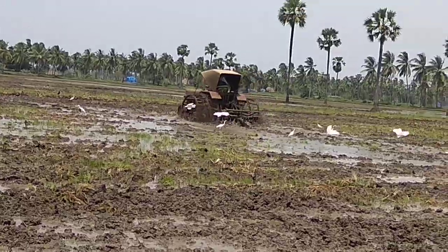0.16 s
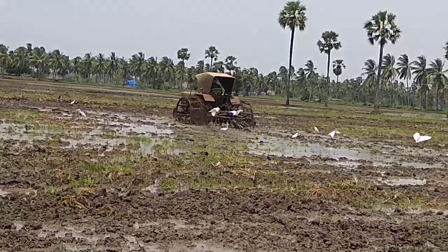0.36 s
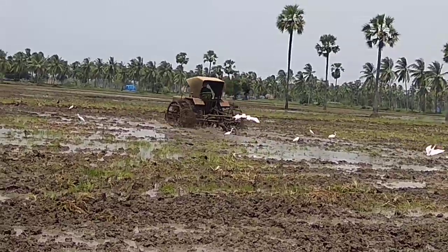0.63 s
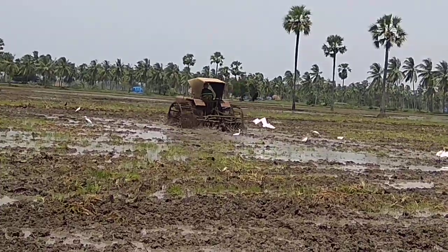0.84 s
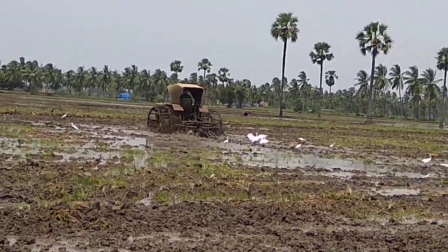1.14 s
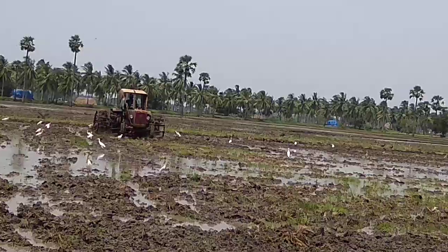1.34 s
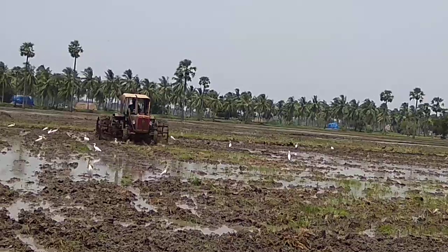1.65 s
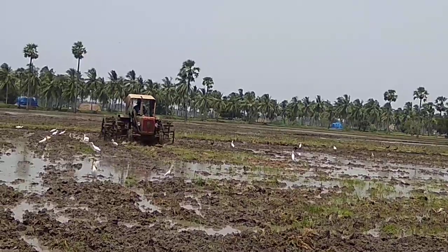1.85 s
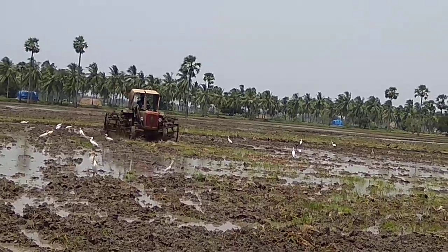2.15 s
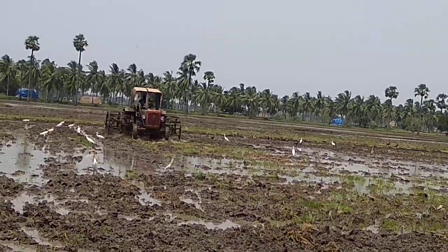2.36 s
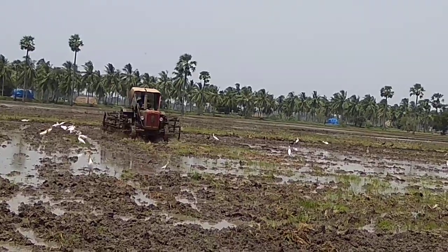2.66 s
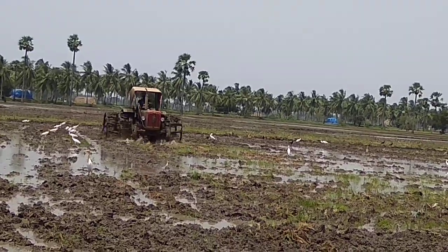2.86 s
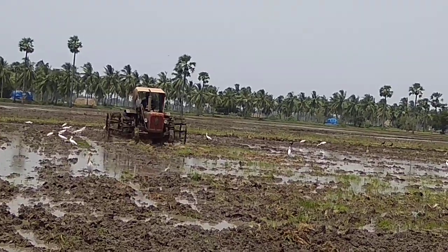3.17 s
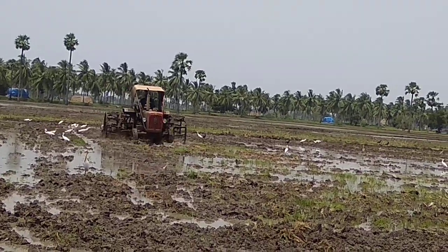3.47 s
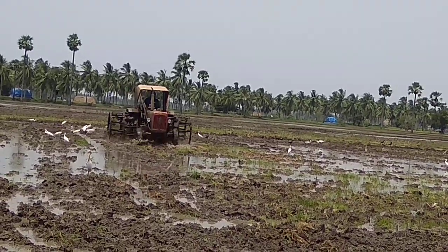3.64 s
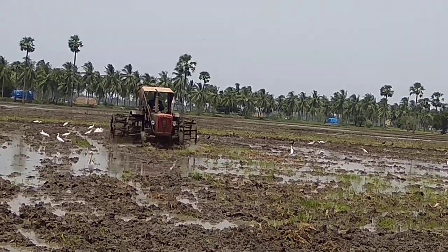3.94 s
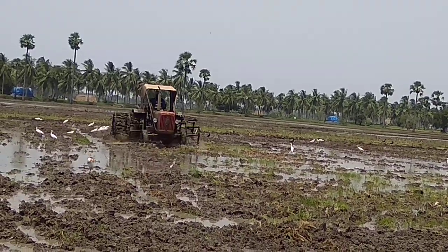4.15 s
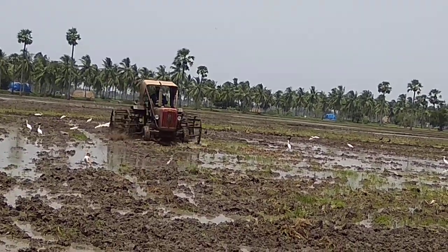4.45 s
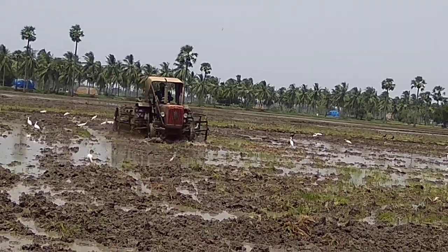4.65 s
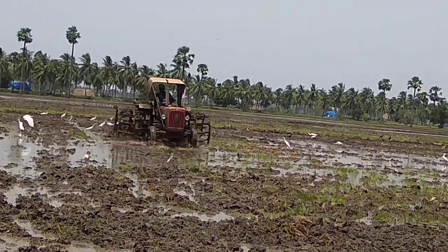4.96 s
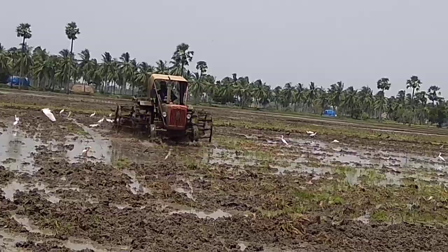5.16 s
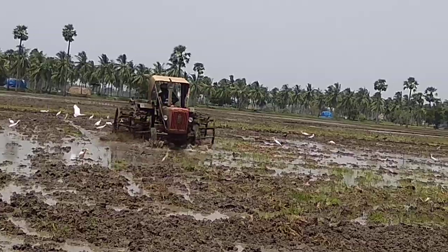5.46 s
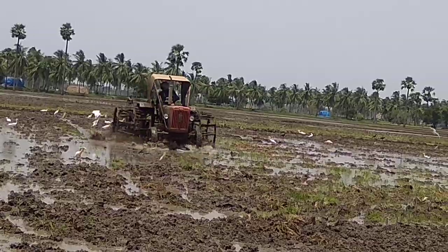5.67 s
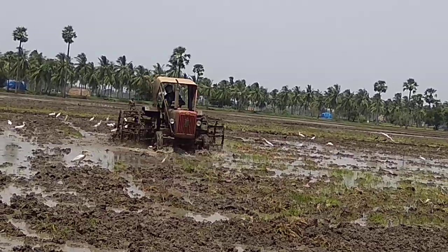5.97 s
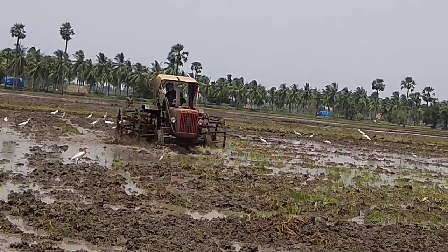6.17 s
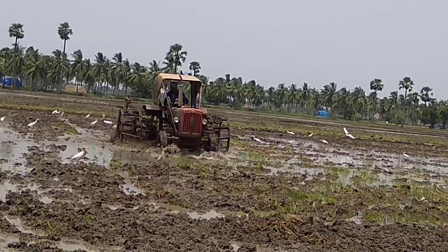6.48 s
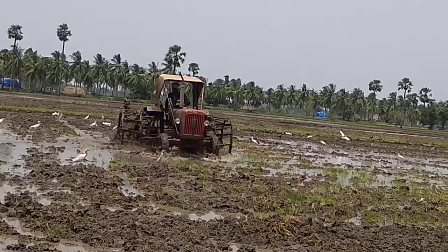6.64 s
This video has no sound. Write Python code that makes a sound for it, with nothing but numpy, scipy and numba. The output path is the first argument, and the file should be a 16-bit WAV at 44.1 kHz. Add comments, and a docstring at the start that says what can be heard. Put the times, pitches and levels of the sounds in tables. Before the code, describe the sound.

First, gale buffeting overloads the left side while a departing tractor throbs dully behind it. A hard cut follows, and a laboring four-cylinder diesel approaches, revving up slightly over the first second, then holding a deep drone with knocking, hollow exhaust resonance, rasp and fine hiss. Short wind thumps continue on the left until about four seconds, then weaken. Open field, no reverberation, exposed stereo microphone.

```python
"""First a four-cylinder diesel tractor drives off with cage wheels through a flooded field: a dull roar of
noise pulsed by the firings, drowned on the left of two microphone ports by a gale of modulated noise and slaps.
After a hard cut it comes on, speeding up, and the wind only gusts. Harmonics give a clean drone, pulses
sharp strokes, and gated noise a roar, a pipe with an echo, a rasp and a short treble hiss, over a noise rumble.
Last of all a limiter holds down the low band at each port, peaks are rounded and the top is cut."""
import sys
import numpy as np
from scipy import signal
from scipy.fft import rfft, irfft
from scipy.io import wavfile
from scipy.ndimage import uniform_filter1d
from numba import njit

SR = 44100
rng = np.random.default_rng(int(sys.argv[2]) if len(sys.argv) > 2 else 0)


def dump_mix(stems):
    """Bounce the given channels to the path in sys.argv[1] as a 16-bit WAV at rate SR."""
    frames = np.atleast_2d(stems).T  # one column per channel
    limited = np.clip(frames, -1, 1)  # hard clip at full scale
    pcm = np.round(limited * 32767).astype(np.int16)
    wavfile.write(sys.argv[1], SR, pcm)


N = 300321
T = np.arange(N) / SR
HZ = np.arange(N // 2 + 1) * SR / N + 1e-3  # bin frequencies, kept off zero

# Spectrum of the departing engine heard from behind: (frequency [Hz], left level [dB], right level [dB])
REAR_SPECTRUM = [(59.4, 31.5, -10), (300, -52, -8), (667, -27, -32), (1200, -15, -16.5), (1750, -5, -16),
                 (2230, -15, -28), (2460, -12, -16), (2640, -39, -22.5), (4040, -34.5, -50),
                 (6260, -19.5, -29), (8300, -48, -45), (9740, -54, -31), (12200, -23, -70),
                 (13000, -44, -32)]
# Spectrum of the wind buffets: (frequency [Hz], level [dB])
BUFFET_SPECTRUM = [(15, -38), (30, -17), (60, -8.5), (100, 0.5), (170, -0.5), (250, -5), (400, -10.5),
                   (600, -22), (900, -32.5), (1500, -37.5), (2500, -62.5), (5000, -74.5)]
# Gusts on the left port: (start [s], length [s], low buffet [dB], upper buffet against the low one [dB])
LEFT_GUSTS = [(1.41, 0.14, -16, -7.5), (1.59, 0.059, -14.5, -6), (1.768, 0.099, -16.5, -41),
              (1.9, 0.085, -15, -17), (2.1, 0.41, -29.5, -3.5), (2.525, 0.12, -20, -14),
              (2.668, 0.12, -16, -4.5), (3.072, 0.078, -23, -2), (3.361, 0.048, -18, -6),
              (3.401, 0.029, -7.5, -8), (3.463, 0.032, -13.5, -6), (3.19, 0.041, -33, -13),
              (3.54, 0.046, -19.5, -41), (3.68, 0.1, -20.5, -5.5), (3.82, 0.033, -13.5, -21),
              (4.08, 0.023, -14, -0.5), (4.133, 0.028, -15, -3), (4.53, 0.048, -25, -10),
              (4.804, 0.11, -24.5, -2), (5.542, 0.11, -27, 0), (6.338, 0.068, -26, -2),
              (6.468, 0.064, -26.5, 9.5), (6.668, 0.16, -23.5, 6.5)]
# Wind on the sheltered right port: (time [s], low buffet [dB], upper buffet against the low one [dB])
LEE_WIND = [(0, -111, 3), (.2, -32, -5), (.6, -30, 0), (1.0, -38, -7), (1.3, -27, -4), (1.5, -55, -16),
            (1.9, -50, -11), (2.55, -55, -3), (3.1, -49, 4), (3.5, -52, 5), (3.8, -58, -5), (4.3, -37.5, 7),
            (5.0, -34, -3), (5.7, -34, -3), (6.2, -44, 16), (6.8, -34, -3)]
# Sharp slaps of the gale on the left port: (peak time [s], strength [dB])
SLAP_TIMES = [(.05, -27), (.16, -1), (.21, -7), (0.314, -9), (0.389, -4), (.475, -7), (.703, -17),
              (.765, -5), (0.852, -2), (1.017, 0), (1.047, -5), (1.236, -9), (1.31, -25)]
# Spectrum of a slap: (frequency [Hz], level [dB])
SLAP_SPECTRUM = [(200, -26), (500, -3), (1000, -1), (2000, -27), (3200, -41), (6000, -62)]
# Speed of the oncoming engine: (time [s], firing rate [Hz])
FIRING_RATE = [(1.45, 61.44), (1.8, 65.13), (2, 67.06), (2.2, 68.49), (2.4, 69.56), (3, 68.88),
               (3.6, 69.87), (4, 69.6), (4.4, 68.26), (4.8, 68.39), (5.2, 68.87), (5.6, 68.99),
               (6.4, 68.75), (6.7, 68.16)]
# Levels of the oncoming tractor; the right port's bass dips while the left is buffeted: (time [s], second
# partial at the left port [dB], bass gain at the right port against the left [dB], treble hiss [dB])
ONCOMING_LEVELS = [(1.35, -24.5, -2, -33.5), (1.5, -13.5, -22.5, -39), (1.8, -21, -2.5, -37.5),
                   (2.2, -17.5, -9, -39), (2.45, -22.5, -8, -44), (2.65, -18, -5.5, -37),
                   (2.95, -27.5, -5, -48.5), (3.05, -18, -8, -41), (3.3, -18.5, -11.5, -42),
                   (3.4, -26, -16, -48.5), (3.62, -18.5, -16, -49.5), (3.95, -19.5, -7.5, -43.5),
                   (4.2, -17.5, -7, -44), (4.45, -16, -4, -37), (5.0, -14, -6, -39), (5.6, -16, -5, -38),
                   (5.9, -15, -6.5, -42), (6.3, -13, -6.5, -36), (6.8, -12.5, -6, -37.5)]
# Drone partials: (multiple of the firing rate [1], level against the second partial [dB], phase lead [turns])
DRONE_PARTIALS = [(.5, -27, 0), (1, -5.5, 0), (2.5, -24, .2), (3.5, -26, .7), (4, -19, .5), (4.5, -31, .3),
                  (5, -33, .5)]
# Third partial of the drone: (time [s], level against the second partial [dB])
THIRD_PARTIAL = [(1.35, -16.5), (4.2, -20.5), (4.5, -11.5), (4.85, -9), (5.1, -21.5), (6.0, -20),
                 (6.5, -17), (6.8, -9)]
# Spectrum of the body rumble: (frequency [Hz], left level [dB], right level [dB])
RUMBLE_SPECTRUM = [(20, -2, -8), (38, 10, 7), (80, 9.5, 11.5), (110, 6, 7), (170, 5, 6), (240, 0, 2),
                   (340, 9.5, -8), (440, -3, -9), (700, -30, -21)]
# Spectrum of the exhaust pipe: (frequency [Hz], left level [dB], right level [dB])
PIPE_SPECTRUM = [(200, -30, -35), (330, -4, -16), (430, -3, -17), (550, -5, -9), (760, .5, -5.5),
                 (880, 1, -7), (1000, -5, -14.5), (1150, -18, -24), (1500, -45, -50)]
# Spectrum of the roar and the strokes: (frequency [Hz], left level [dB], right level [dB])
ROAR_SPECTRUM = [(700, -30, -35), (950, -14, -20), (1150, -5, -9), (1400, -3, -7), (1600, 2.5, -1.5),
                 (1850, -5, -8), (2150, -3, -5), (2450, -3, -6), (2700, -8, -13), (2850, -19, -21),
                 (3000, -32, -28), (3600, -40, -40)]
# Spectrum of the rasp and the hiss: (frequency [Hz], left level [dB], right level [dB])
HISS_SPECTRUM = [(2600, -30, -30), (3100, -21, -17), (3500, -4, -15), (4200, -8, -26), (4800, -7, -13),
                 (5800, -19, -13), (6700, -12, -8), (7900, -4, -9), (8950, -20, -16), (9700, -2, -3),
                 (11300, -11, -11), (12200, -6, -15), (13100, -2, -7), (15600, -15, -14)]

CUT_S = 1.339
PORT_LAG_S, TREBLE_LAG_S, BASS_LAG_S = .000105, .00007, .00014  # the left port hears later
FAR_HZ, FAR_DB, RECEDE_DB_PER_S = 58, -39, -1.5  # departing: firing rate, first level, its slope

# Left-port wind: low buffet, upper buffet against it, spread of the swings, shared by both buffets
GALE_DB, GALE_UPPER_DB, GALE_SWING_DB = -1, 4.5, 2
BREEZE_DB, BREEZE_UPPER_DB, BREEZE_SWING_DB = -34, -1.5, 6
GALE_EDGE_S = .003  # fade at either end of the gale
GUST_ATTACK_S, GUST_RELEASE_S = .025, .022
SLAP_DB, SLAP_ATTACK_S, SLAP_RELEASE_S = -4, .0025, .0069
BUFFET_SPLIT_HZ = 135  # between the low and the upper buffet

WAVER_RAD = .22  # phase drift of a partial's angle
KNOCK_LAG, PUFF_LAG = .2, .1  # delays after the firing [turns], one turn per firing
RUMBLE_SPLIT_HZ, PIPE_SPLIT_HZ, TOP_SPLIT_HZ = 300, 690, 11400
PIPE_ECHO_S, PIPE_ECHO = .00809, .9  # delay and gain of the echo
PIPE_DB, UPPER_PIPE_DB = -4, -7.5  # against the roar
PIPE_SHUT_DB, PIPE_OPENS_S, PIPE_RISE_S = -12, 1.92, .08  # weak rings, midpoint and time scale of the rise
ROAR_DB, APPROACH_DB_PER_S = -38, 1.29  # at the cut, and its growth
ROAR_PER_HISS, HISS_MEAN_DB = .42, -37  # share of the hiss swells about this level that the roar follows
STROKE_DB, STROKE_SCATTER_DB = -6.5, 3  # against the noise of the roar; spread of strength
STROKE_LAG, STROKE_JITTER = .3, .01  # delay after the firing and its spread [turns]
RASP_DB, RASP_STEADY = -10, .083  # against the roar; share of the hiss swells taken back out of the rasp
RASP_WALK_DB = 1.82  # spread of the rasp level
TOP_START_DB, TOP_DB_PER_S = -6, 1.3  # top of the hiss: gain at the cut, and its growth
TOP_HZ = 15750  # upper limit of the final sound


def undb(db):
    """Logarithmic level: decibels to amplitude gain."""
    return 10 ** (np.asarray(db) / 20)


def curves(rows):
    """Linear interpolation: each column joined by straight lines in time."""
    s, *columns = np.transpose(rows)
    return [np.interp(T, s, c) for c in columns]


def highpass(x, hz, order):
    """Zero-phase filtering: the spectrum falls off below hz."""
    return irfft(rfft(x) / (1 + (hz / HZ) ** order), N)


def colour(x, table, band_hz, extra=1):
    """Spectral shaping: one output per level column; their mean has rms 1 inside the band."""
    hz, *levels = np.transpose(table)
    gain = undb([np.interp(np.log(HZ), np.log(hz), db) for db in levels])
    spectra = rfft(x) * extra * gain
    inside = np.mean(spectra, axis=0)[(HZ > band_hz[0]) & (HZ < band_hz[1])]
    return irfft(spectra, N) * N / np.sqrt(2 * np.sum(abs(inside) ** 2))


def walk(rate):
    """Slow random modulation: levels held 1 / rate s, then smoothed twice; spread near 1."""
    k = int(SR / rate)
    held = np.repeat(rng.standard_normal(N // k + 1), k)
    return 1.3 * uniform_filter1d(uniform_filter1d(held, k), k)[:N]


def ports(likeness, lag_s):
    """Partial coherence: noise partly shared by two ports, the shared part later at the left."""
    shared, left, right = rng.standard_normal((3, N))
    own = np.sqrt(1 - np.clip(likeness, 0, 1))
    lagged = irfft(rfft(shared) * np.exp(-2j * np.pi * HZ * lag_s), N)
    return np.sqrt(1 - own ** 2) * np.array([lagged, shared]) + own * np.array([left, right])


def puffs(turns, length, floor, scatter_db):
    """Periodic gating: a burst of random strength follows each firing and decays over a steady floor."""
    size = undb(scatter_db * rng.standard_normal(N // 100))[turns.astype(int)]
    part = turns % 1 / length
    return floor + size * np.sqrt(2 * np.e * part) * np.exp(-part)


def departing():
    """Amplitude modulation: firings throb faintly in the dull roar heard from behind and downwind."""
    pulse = puffs(FAR_HZ * T, .2, 2.5, 3.0)
    roar = ports(.4, PORT_LAG_S) * pulse * undb(.6 * walk(8))
    return undb(FAR_DB + RECEDE_DB_PER_S * T) * colour(roar, REAR_SPECTRUM, (1100, 2700))


def gusts():
    """Wind intermittency: low and upper buffet gains on the left port, a gale, then gusts over a breeze."""
    edges = np.clip(np.minimum(T, CUT_S - T) / GALE_EDGE_S, 0, 1) ** 2
    gale = undb(GALE_DB + GALE_SWING_DB * walk(15.8)) * edges
    breeze = undb(BREEZE_DB + BREEZE_SWING_DB * walk(9))
    low = gale + breeze
    upper = undb(GALE_UPPER_DB + 1.5 * walk(13.0)) * gale + undb(BREEZE_UPPER_DB) * breeze
    for start, length, db, upper_db in LEFT_GUSTS:
        rise = np.clip((T - start) / GUST_ATTACK_S, 0, 1)
        shape = rise * np.exp(-np.clip(T - start - length, 0, 1) / GUST_RELEASE_S)
        low = low + undb(db) * shape
        upper = upper + undb(db + upper_db) * shape
    return low, upper


def buffets(gains, flutter_db, top_hz):
    """Turbulent pressure: eddies at one port give a low thud and a higher flutter."""
    low_gain, upper_gain = gains
    eddies = rng.standard_normal(N) * undb(flutter_db * walk(35))
    low_cut = 1 / (1 + (HZ / BUFFET_SPLIT_HZ) ** 6)
    upper_cut = 1 / (1 + (BUFFET_SPLIT_HZ / HZ) ** 6) / (1 + (HZ / top_hz) ** 3)
    low = colour(eddies, BUFFET_SPECTRUM, (72, 122), low_cut)[0]
    upper = colour(eddies, BUFFET_SPECTRUM, (150, 500), upper_cut)[0]
    return low_gain * low + upper_gain * upper


def wind():
    """Incoherent turbulence: each port has its own eddies, weaker, duller and more fitful at the right."""
    lee_db, lee_upper_db = curves(LEE_WIND)
    left = buffets(gusts(), 1.8, 6000)
    right = buffets(undb([lee_db, lee_db + lee_upper_db]), 4.0, 300)
    return np.array([left, right])


def slaps():
    """Impact of turbulence: short bright noise bursts where an eddy hits the left port head on."""
    shape = np.zeros(N)
    for s, db in SLAP_TIMES:
        rise = np.clip((T - s) / SLAP_ATTACK_S + 1, 0, 1)
        shape += undb(db) * rise * np.exp(-np.clip(T - s, 0, 1) / SLAP_RELEASE_S)
    return undb(SLAP_DB) * shape * colour(rng.standard_normal(N), SLAP_SPECTRUM, (400, 3000))[0]


def drone(turns):
    """Fourier series: partials of the firing rate sum to a tone; all but the second drift in phase."""
    angle = 2 * np.pi * (turns - .5)
    total = np.sin(2 * angle)
    third_gain = undb(curves(THIRD_PARTIAL)[0] + 2.5 * walk(18))
    total = total + third_gain * np.cos(3 * (angle + WAVER_RAD * walk(14)) + np.pi)
    for k, db, lead in DRONE_PARTIALS:
        # the higher a partial, the more it wavers on its way over the field
        gain = undb(db + (1.2 + .7 * k) * walk(11))
        total = total + gain * np.cos(k * (angle + WAVER_RAD * walk(14)) + 2 * np.pi * lead)
    return np.sqrt(2) * total


def body_rumble(shut_db):
    """Broadband vibration: swelling low noise, its upper part weak until the pipe rings out."""
    noise = colour(rng.standard_normal(N), RUMBLE_SPECTRUM, (40, 400))
    rumble = undb(-17.0 + 5.4 * walk(9.8)) * noise
    return rumble + (undb(shut_db) - 1) * highpass(rumble, RUMBLE_SPLIT_HZ, 6)


def exhaust_pipe(turns, shut_db):
    """Comb filtering: the open pipe end sends the sound back once, giving peaks and notches."""
    # the echo fades towards the bass
    echo = 1 + PIPE_ECHO / (1 + (560 / HZ) ** 8) * np.exp(-2j * np.pi * HZ * PIPE_ECHO_S)
    gated = ports(.92, PORT_LAG_S) * puffs(turns + 1 - KNOCK_LAG, .12, 4, 2)
    pipe = colour(gated, PIPE_SPECTRUM, (450, 700), echo)
    # the lower and the upper rings swell and fade on their own
    upper = highpass(pipe, PIPE_SPLIT_HZ, 24)
    lower_gain = undb(PIPE_DB + shut_db + 1.5 * walk(9))
    upper_gain = undb(UPPER_PIPE_DB + shut_db / 3 + 1.6 * walk(16))
    return lower_gain * (pipe - upper) + upper_gain * upper


def combustion_strokes(turns):
    """Impulse excitation: each combustion strikes the block once, with scattered timing and strength."""
    late = turns - STROKE_LAG + STROKE_JITTER * walk(70)
    blows = np.diff(np.floor(late), prepend=-1) * undb(STROKE_SCATTER_DB * walk(70))
    both = np.array([np.roll(blows, round(PORT_LAG_S * SR)), blows])
    return colour(both, ROAR_SPECTRUM, (1100, 2700))


def combustion_roar(turns, knock):
    """Gated noise with impulses: knock shapes the roar, and sharp strokes join it at constant power."""
    noise = ports(.8, PORT_LAG_S) * knock * undb(.8 * walk(10))
    roar = colour(noise, ROAR_SPECTRUM, (1100, 2700))
    strokes = combustion_strokes(turns)
    return (roar + undb(STROKE_DB) * strokes) / np.hypot(1, undb(STROKE_DB))


def fan_and_spray(knock):
    """Modulated noise: a rasp timed by the knock, its level varied by a slow random walk."""
    noise = ports(.55, TREBLE_LAG_S) * (knock + 1.5)
    rasp = colour(noise, HISS_SPECTRUM, (3300, 8500), 1 / (1 + (HZ / 11000) ** 6))
    return rasp * undb(RASP_WALK_DB * walk(9))


def exhaust_hiss(turns):
    """Jet noise: each exhaust puff gates a short hiss in the top octave."""
    puff = puffs(turns + 1 - PUFF_LAG, .06, 0, 3.8)
    noise = ports(.55, TREBLE_LAG_S) * (puff + .29) * undb(1.1 * walk(7) + 1.3 * walk(14))
    hiss = colour(noise, HISS_SPECTRUM, (9000, 15500), 1 / (1 + (10000 / HZ) ** 4))
    # the very top, lost in the air at first, grows on the approach
    top_db = TOP_START_DB + TOP_DB_PER_S * (T - CUT_S) + 2.0 * walk(11)
    return hiss + (undb(top_db) - 1) * highpass(hiss, TOP_SPLIT_HZ, 16)


def oncoming():
    """Superposition: drone, rumble, pipe, roar, rasp and hiss add; all but the rumble follow the firings."""
    second_db, right_db, hiss_db = curves(ONCOMING_LEVELS)
    swell_db = hiss_db - HISS_MEAN_DB
    roar_db = ROAR_DB + ROAR_PER_HISS * swell_db + APPROACH_DB_PER_S * (T - CUT_S)
    # the pipe rings, above all the lower ones, are weak until the engine is up to speed
    shut_db = PIPE_SHUT_DB / (1 + np.exp((T - PIPE_OPENS_S) / PIPE_RISE_S))
    turns = np.cumsum(curves(FIRING_RATE)[0]) / SR
    tone = drone(turns)
    rumble = body_rumble(shut_db)
    left_bass = np.roll(tone + rumble[0], round(BASS_LAG_S * SR))
    right_bass = undb(right_db) * (tone + rumble[1])
    bass = undb(second_db) * np.array([left_bass, right_bass])
    pipe = exhaust_pipe(turns, shut_db)
    knock = puffs(turns + 1 - KNOCK_LAG, .1, 2.6, 2.5)
    roar = combustion_roar(turns, knock)
    rasp = undb(RASP_DB - RASP_STEADY * swell_db) * fan_and_spray(knock)
    return bass + undb(roar_db) * (pipe + roar + rasp) + undb(hiss_db) * exhaust_hiss(turns)


def scene():
    """Superposition: wind and left-port slaps over two views of the field joined by a hard cut."""
    tractor = np.where(T < CUT_S, departing(), oncoming())
    return tractor + wind() + slaps() * np.array([[1], [0]])


@njit
def limit(x, top, ratio, attack, release):
    """Dynamic compression: follows the peak level and pulls down what passes the top."""
    y, level = np.empty(len(x)), top
    for i in range(len(x)):
        peak = abs(x[i])
        level += (peak - level) * (attack if peak > level else release)
        y[i] = x[i] * min(1., top / level) ** (1 - 1 / ratio)
    return y


def record(dry):
    """Compression and saturation: each port's low band is limited, peaks are rounded, the top is cut."""
    low = signal.sosfiltfilt(signal.butter(2, 2500, fs=SR, output="sos"), dry)
    attack, release = 1 / (.0022 * SR), 1 / (.011 * SR)  # time constants 2.2 ms and 11 ms
    held = dry - low + np.array([limit(port, .58, 8.7, attack, release) for port in low])
    rounded = .95 * np.tanh(held / .95)
    return signal.sosfilt(signal.ellip(12, .3, 80, TOP_HZ, fs=SR, output="sos"), rounded)


dry = scene()
out = record(dry)
dump_mix(out)
```